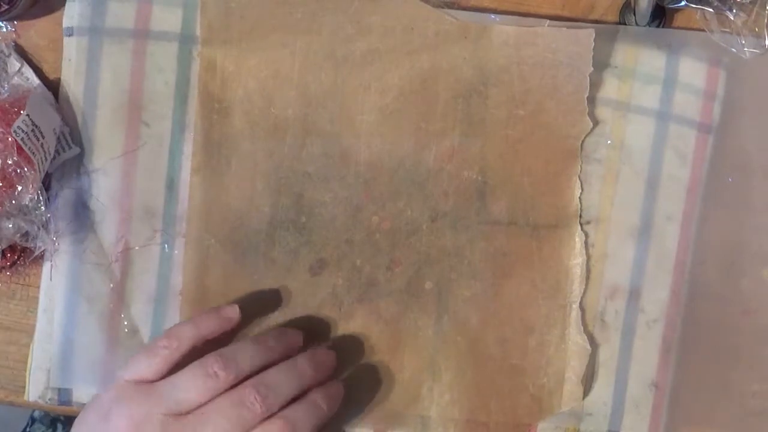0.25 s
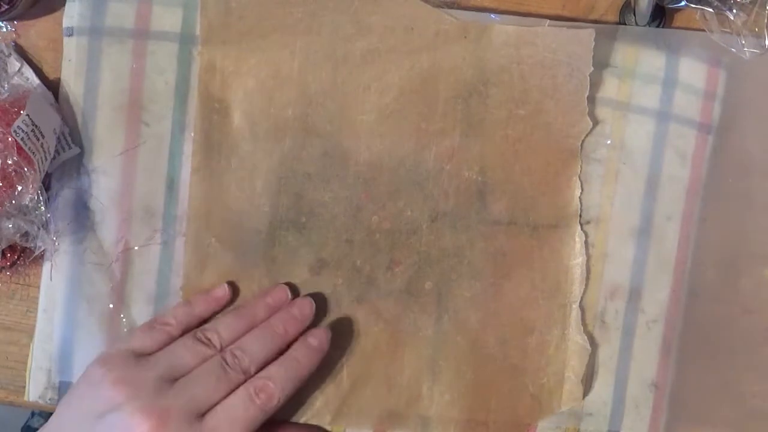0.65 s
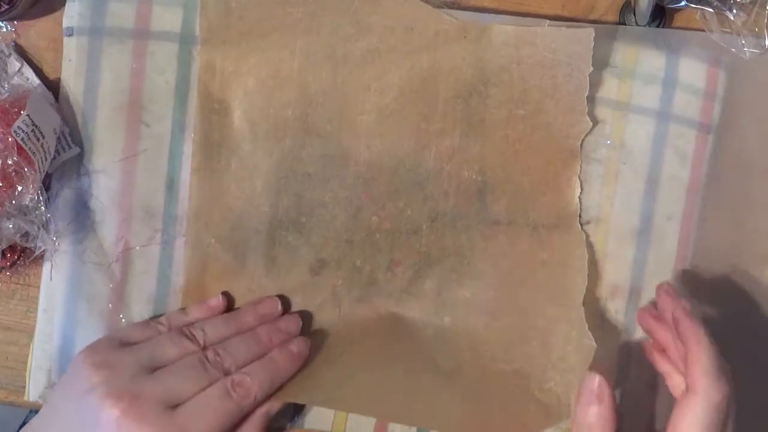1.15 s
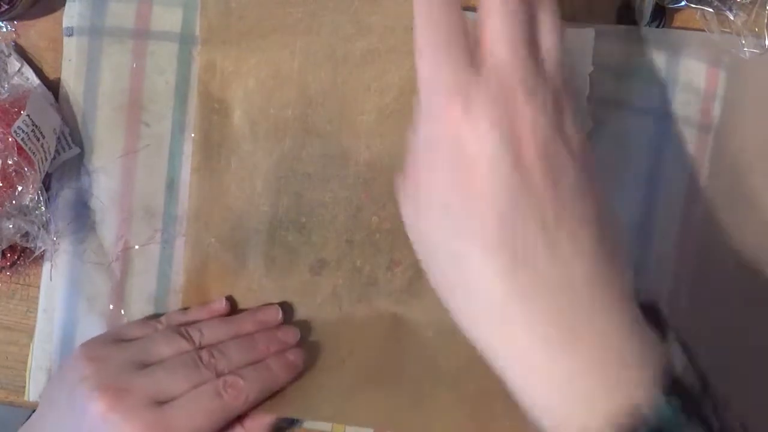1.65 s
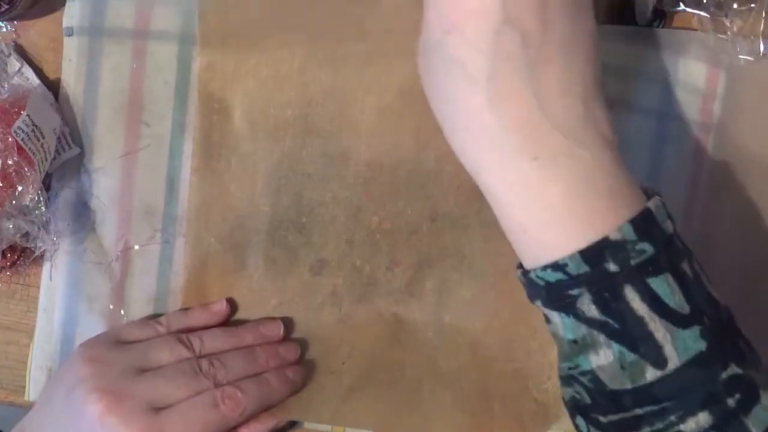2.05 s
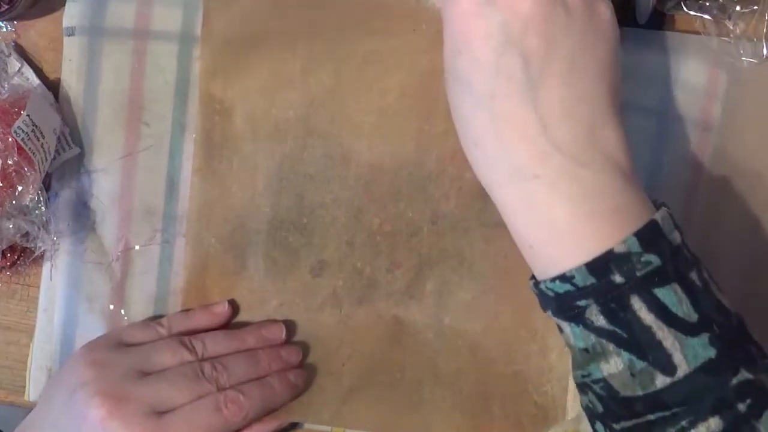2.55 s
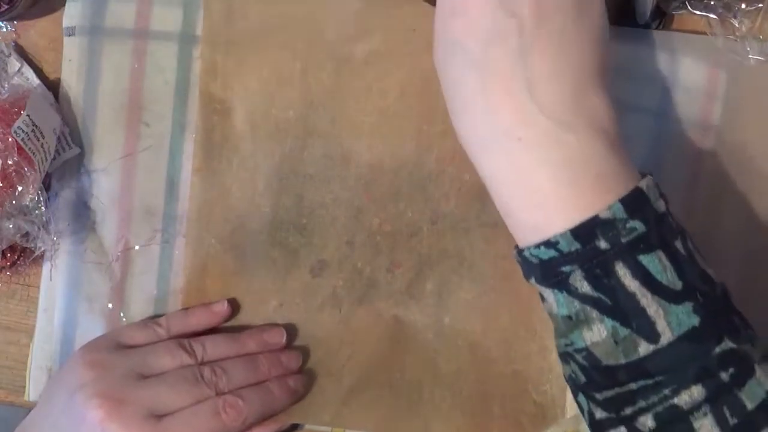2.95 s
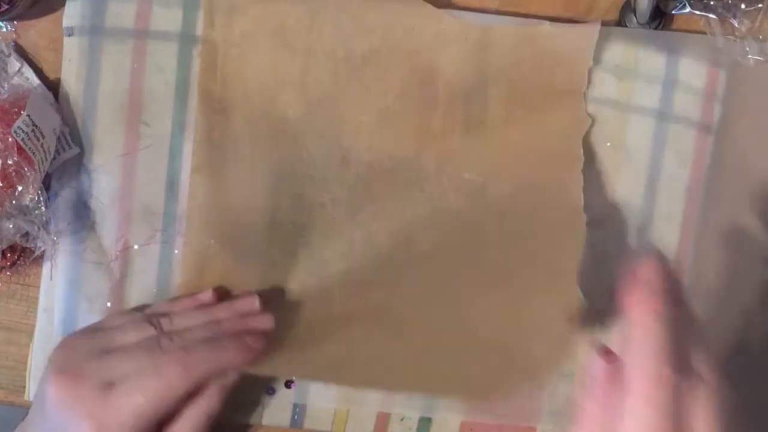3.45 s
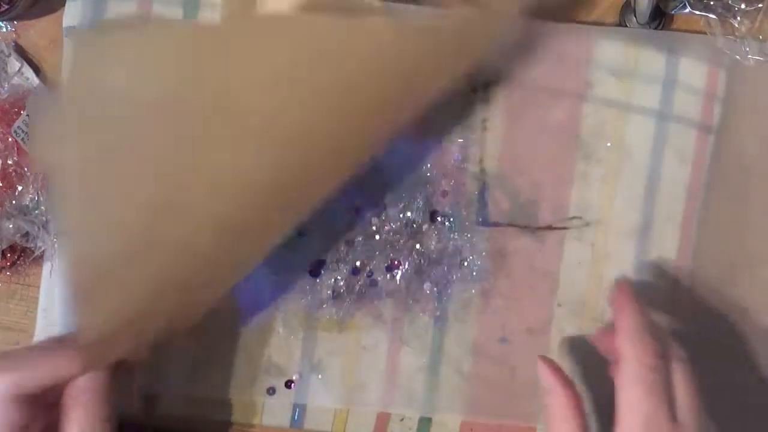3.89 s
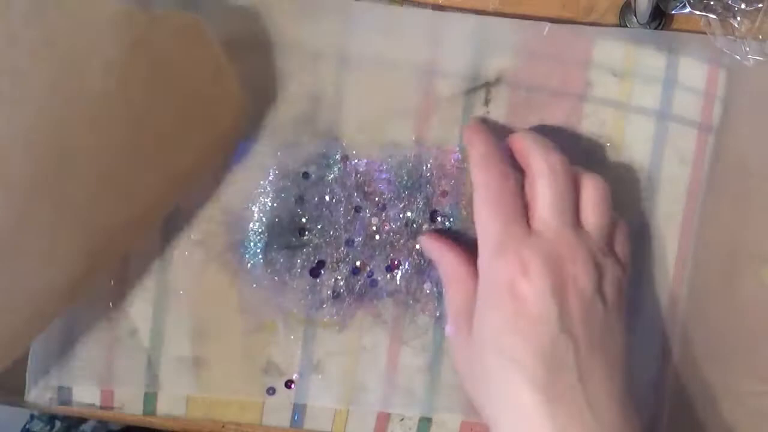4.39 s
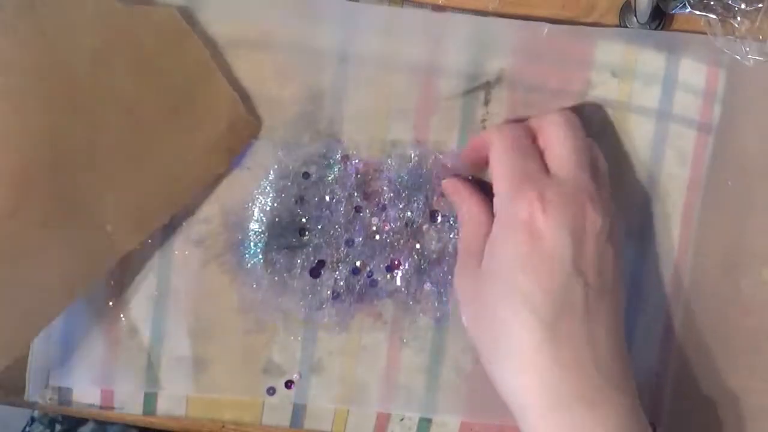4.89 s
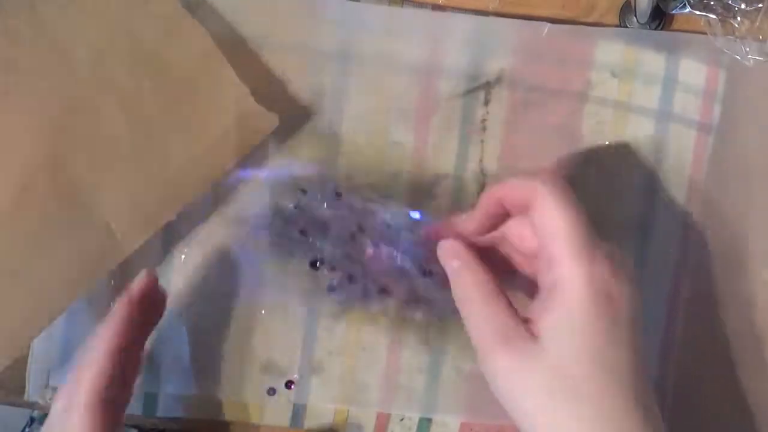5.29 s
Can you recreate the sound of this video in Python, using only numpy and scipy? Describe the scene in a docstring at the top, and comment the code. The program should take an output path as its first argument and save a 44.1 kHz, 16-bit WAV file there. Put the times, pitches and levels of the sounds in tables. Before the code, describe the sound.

Close to the microphone in a small, still room, a short rumble of an iron dragging over a table gives way to baking paper being handled. Soft rustling and separate clicks build into sharp, dry crackling as the sheet is pressed and lifted. It drops flat with a dull slap and the crinkling thins out. Underneath are soft hand rumble, very faint rapid ticking and a slight hum.

```python
"""An iron slides to a stop on a cloth-covered table, rumbling through the top, close to the microphone.
Hands press, lift and peel a sheet of baking paper: rubbing fibres rustle, buckling creases snap and
crackle, taut patches pop with a pitch, and the lifted sheet lands flat with a dull slap.
Underneath, a faint mechanism ticks and something hums in the still air of a small room."""
import sys
import numpy as np
from scipy import signal
from scipy.fft import rfft, irfft, next_fast_len
from scipy.io import wavfile
from scipy.ndimage import uniform_filter1d, map_coordinates

SR = 44100
rng = np.random.default_rng(int(sys.argv[2]) if len(sys.argv) > 2 else 0)


def generate_wav(sig):
    """Save sig (samples, or channels by samples) to the path in sys.argv[1] as 16-bit PCM at SR."""
    pcm = np.round(np.clip(np.atleast_2d(sig).T, -1, 1) * 32767).astype(np.int16)
    wavfile.write(sys.argv[1], SR, pcm)


N = 243855


def amp(db):
    """Gain of a level in dB."""
    return 10 ** (np.asarray(db) / 20)

def unit(x):
    """Scaled to rms 1."""
    return x / np.sqrt(np.mean(x ** 2) + 1e-20)

def along(points, hz):
    """(Hz, value) points joined on a log frequency axis."""
    f, v = np.transpose(points)
    return np.interp(np.log(hz + 1), np.log(f + 1), v)

def curve(points):
    """(time, value) points joined into one value per sample."""
    return np.interp(np.arange(N) / SR, *np.transpose(points))

def wobble(rate):
    """A smooth random curve, rate knots a second."""
    return map_coordinates(rng.standard_normal(int(N * rate / SR) + 4), [np.arange(N) * rate / SR])

def filtered(x, response):
    """x through a complex frequency response."""
    m = next_fast_len(N + SR // 2)
    return irfft(rfft(x, m) * response(np.fft.rfftfreq(m, 1 / SR)), m)[..., :N]

def resonances(modes):
    """Causal response of (Hz, width, dB) modes."""
    return lambda f: sum((-1) ** k * amp(db) * 1j * f * width / (hz * hz - f * f + 1j * f * width)
                         for k, (hz, width, db) in enumerate(modes))

def paper(modes):
    """Resonances with a steep low cut: thin paper radiates no bass."""
    return lambda hz: resonances(modes)(hz) * (1j * hz / (1j * hz + 500)) ** 2

def placed(seconds, shapes):
    """Short shapes summed at their start times."""
    at = np.round(seconds * SR).astype(int)[:, None] + np.arange(shapes.shape[1])
    return np.bincount(at.ravel(), shapes.ravel(), N + SR)[:N]

def bursts(count, attack, t60):
    """Rows of dying noise, each of energy 1; attack and t60 in seconds."""
    t = np.arange(SR // 40) / SR
    rows = (1 - np.exp(-t / attack)) * amp(-60 * t / t60) * rng.standard_normal((count, len(t)))
    return rows / np.linalg.norm(rows, axis=1)[:, None]

# Likeness at the microphone's left and right ports: (frequency [Hz], correlation [0..1])
PORT_LIKENESS = [(60, 0.9), (130, 0.92), (300, 0.59), (2000, 0.75), (10000, 0.88)]
def stereo(pair, response):
    """Two unrelated signals coloured and mixed as mid and side for the two ports; rms 1."""
    turn = lambda hz: np.arccos(np.clip(along(PORT_LIKENESS, hz), -1, 1)) / 2
    mid, side = filtered(pair, lambda hz: response(hz) * [np.cos(turn(hz)), np.sin(turn(hz))])
    return unit(np.array([mid + side, mid - side]))

# The iron dragging over the table, close by: (time [s], level [dB])
IRON_DRAG = [(0, -39), (.025, -50.5), (.048, -36), (.075, -44.5), (.1, -42), (.18, -48.5), (.22, -62),
             (.3, -93)]
# Modes of the table top: (frequency [Hz], width [Hz], gain [dB])
TABLE_MODES = [(62.4, 28, -7), (120, 13, 6), (140, 1.05, 0), (188, 160, -9.5), (334, 28, 0),
               (447, 105, -13.5), (663, 39, -9.5), (840, 130, -17)]
def iron():
    """The sole plate judders over the cloth; the table top rumbles and its narrowest mode rings on."""
    drag = amp(curve(IRON_DRAG))
    judder = drag * amp(1.5 * wobble(45)) * rng.standard_normal((2, N))
    mid_side = [[1], [.5]]  # close by, so nearly alike at both ports
    return np.sqrt(np.mean(drag ** 2)) * stereo(judder * mid_side, resonances(TABLE_MODES))

def crackle():
    """Tiny creases give way at random, few large and many small; rms 1."""
    when, rank = rng.random((1500, 2)).T
    size = amp(-3.2 * np.log(1 - .985 * rank))  # stops short of the rarest, largest ones
    return unit(placed(when * N / SR, size[:, None] * bursts(len(when), attack=0.00005, t60=0.002)))

def patchy(pair, spread_db):
    """Random patches of gain in time and frequency, as different parts of the sheet sound."""
    spectrum = signal.stft(pair, nperseg=256)[2]
    field = uniform_filter1d(rng.standard_normal(spectrum.shape[1:]), size=5, axis=0)
    field = uniform_filter1d(field, size=14, axis=1)
    return signal.istft(spectrum * amp(spread_db * unit(field)), nperseg=256)[1][:, :N]

# Shifts of the sheet near the microphone, the first as the iron slides over it and the rest under a hand: (full
# from [s], swell [s], hold [s], fade [s], # level [dB], sizzle over level [dB], dull flap over level [dB])
SHEET_MOVES = [(0.0, .01, 0.21, 0.03, -54, 2.5, -1.5), (0.476, 0.081, 0, 0.021, -61, 7.5, -16),
               (0.657, 0.017, 0.035, 0.03, -56.5, 4, -1.5), (0.71, 0.028, 0.24, .1, -60, 1, -5),
               (0.985, 0.12, 0.029, 0.06, -42, 0, -5.5), (1.086, 0.036, 0.0061, 0.064, -46.5, 2.5, -2),
               (1.218, 0.061, 0.15, 0.035, -48, 0.5, -6), (1.406, 0.06, 0.02, 0.29, -49.5, -1.5, -4),
               (1.89, 0.024, 0.16, 0.09, -41.5, 4, -3.5), (2.166, 0.11, 0.013, 0.097, -36.5, 4, -4),
               (2.255, 0.032, 0, 0.12, -38, 2.5, -6), (2.428, 0.21, 0.0092, 0.09, -42.5, 6.5, -4),
               (2.478, 0.013, 0.12, 0.068, -47.5, 0.5, -2.5), (2.736, 0.059, 0.28, 0.16, -42.5, 3, -4.5),
               (3.343, 0.086, 0.17, 0.072, -44.5, 1.5, -7), (3.491, 0.038, 0.013, 0.027, -30.5, -0.5, -9),
               (3.557, 0.015, 0.022, 0.042, -31.5, -1.5, -7.5),
               (3.676, 0.047, 0.099, 0.11, -42, -0.5, -3.5), (3.83, 0.039, 0.071, 0.26, -38.5, 1.5, -5),
               (4.086, 0.0051, 0.00036, 0.23, -33, -1, -2), (4.344, 0.032, 0.11, 0.046, -53.5, 1, -1),
               (4.451, 0.047, 0.048, 0.067, -35.5, 1, -3), (4.538, 0.015, 0.081, 0.15, -44, 2, 1),
               (4.643, 0.12, 0.054, 0.11, -42.5, -1, -0.5), (4.828, 0.0072, 0.011, 0.013, -36, -1, -3),
               (4.864, 0.019, 0.043, 0.078, -40, 2.5, -4.5), (5.096, 0.13, 0.046, 0.11, -55, 3.5, -9),
               (5.255, 0.23, 0.031, 0.79, -46.5, 2.5, -3), (5.473, 0.14, 0.32, .1, -48, 2.5, 0)]
def moves():
    """Gains of rustle, sizzle and flap: each move swells, holds and fades, and their powers add."""
    span_db, rest_db = 20, -70  # range of one swell or fade; the sheet settling between moves
    t = np.arange(0, N + 64, 32) / SR
    s, swell, hold, fade, db, sizzle_db, flap_db = np.transpose(SHEET_MOVES)[..., None]
    before = np.maximum(s - t, 0) / np.maximum(swell, .005)
    after = np.maximum(t - s - hold, 0) / np.maximum(fade, .005)
    move_db = db - span_db * (before + after)
    powers = [amp(2 * rest_db) + amp(2 * (move_db + over_db)).sum(axis=0)
              for over_db in (0, sizzle_db, flap_db)]
    return [np.interp(np.arange(N) / SR, t, np.sqrt(power)) for power in powers]

# The sheet's broad bending (body), the crease itself, and stiff fibres at the fold (edge),
# each: (frequency [Hz], width [Hz], gain [dB])
BODY_MODES = [(658, 410, -2.5), (1715, 1090, 2)]
CREASE_MODES = [(3120, 2250, -3), (4464, 1420, 0)]
EDGE_MODES = [(6040, 2750, 3), (10600, 3900, 3.5)]
def rustle():
    """Fibres rubbing give a fluttering hiss mixed with crackle, in the three ranges of the sheet."""
    flutter = amp(1.2 * wobble(40) + 2 * wobble(160))
    hiss = unit(flutter * rng.standard_normal((2, N)))
    rubbing = patchy(hiss + 0.55 * np.array([crackle(), crackle()]), spread_db=3.0)
    return sum(gain * stereo(rubbing, paper(modes))
               for gain, modes in zip(moves(), [CREASE_MODES, EDGE_MODES, BODY_MODES]))

# The room's air around the microphone: (frequency [Hz], relative density [dB])
AIR_SPECTRUM = [(15, 1.5), (25, -2.5), (107, -5.5), (156, -2), (798, -10), (979, -9.5), (1670, -13),
                (3000, -15.5), (4400, -19), (11000, -19), (14300, -44), (22000, -120)]
# A background hum swelling and fading: (time [s], level [dB])
HUM_LEVEL = [(.42, -99), (.55, -73), (.7, -69.5), (1.3, -71), (1.45, -101), (1.7, -67), (2.05, -75.5),
             (3.1, -71.5), (4.0, -73.5), (5.53, -81.5)]
def room_tone(hum_hz=104.7):
    """Still air and a wavering hum with a weak octave."""
    air = stereo(rng.standard_normal((2, N)), lambda hz: amp(along(AIR_SPECTRUM, hz)))
    phase = 2 * np.pi * np.cumsum(hum_hz + 0.8 * wobble(9)) / SR
    hum = np.sqrt(2) * (np.sin(phase) + 0.095 * np.sin(2 * phase))
    return amp(-61.5) * air + amp(curve(HUM_LEVEL) + 3.2 * wobble(12)) * hum

# The ring of a faint mechanism nearby: (frequency [Hz], gain [dB], t60 [s])
TICK_MODES = [(2720, 12.5, 0.015), (3010, 18, 0.011)]
def ticking(first_s=.0105, pair_s=.08003):
    """A small mechanism ticks evenly, strong and weak by turns."""
    s = np.arange(first_s, N / SR, pair_s / 2)
    t = np.arange(SR // 30) / SR
    ring = sum(amp(db - 60 * t / t60) * np.sin(2 * np.pi * hz * t) for hz, db, t60 in TICK_MODES)
    onset = 1 - np.exp(-t / 0.0013)
    level_db = -60 - 13 * (np.arange(len(s)) % 2) + rng.standard_normal(len(s))
    return placed(s, amp(level_db)[:, None] * ring * onset)

# Creases buckling at close range: (time [s], level [dB], body over level [dB], edge over level [dB])
BUCKLES = [(0.6646, -28, -5.5, -13), (0.6734, -27.5, -13, -8), (0.712, -50, -8, -1), (0.738, -43, -0.5, -7),
           (0.76, -43, -11, -19), (0.868, -43, -10, -7), (0.9102, -36, -12, 0), (0.94, -45, -21, 7),
           (0.95, -26, -15, -6), (0.968, -41, -17, 4), (0.9775, -39, -8, -4), (0.9965, -24, -11, -3),
           (1.0215, -28, -8, -3.5), (1.0401, -31, -11, -12), (1.0804, -19, -15, -6), (1.106, -32, -17, -3),
           (1.2873, -19.5, -13, -9), (1.32, -28, -10, -8), (1.3351, -27, -11, -2.5),
           (1.348, -21.5, -10.5, -12), (1.366, -25, -6.5, -12), (1.4216, -28, -11, -19),
           (1.4701, -26.5, -14, -29), (1.509, -34, -4.5, -29), (1.8367, -27, -37, -15.5),
           (1.8688, -27, -7.5, -7), (1.9059, -23.5, -7, -2.5), (1.917, -24.5, -7, 6),
           (1.924, -21.5, -22, -22), (1.9453, -23, -14, -16), (1.9518, -22, -11.5, -3),
           (1.9642, -12.5, -33, -6), (1.9668, -26, -3, 5), (1.992, -19.5, -17, 2.5), (1.9944, -27, 4, 0),
           (2.007, -14, -42, -2), (2.016, -21, -5, 2), (2.0242, -12.5, -15, -1), (2.029, -21, -32, -1),
           (2.043, -22, -37, 3.5), (2.0779, -18.5, -5.5, -4.5), (2.096, -28, -24, -10),
           (2.1193, -30, -8, 4), (2.1327, -16.5, -5, 1), (2.1442, -24, -23, 6), (2.17, -23, -23, -3),
           (2.1743, -21, -21, -5), (2.1903, -21.5, -11, 4), (2.2196, -25, -3, 0), (2.2418, -14, -28, -16),
           (2.2451, -12.5, -12, -1.5), (2.2493, -19, -25, -24), (2.2621, -24, -0.5, 1),
           (2.2776, -21.5, -7.5, 5), (2.3334, -21.5, -50, -12), (2.363, -20, -40, 5), (2.4, -27.5, -3, -1),
           (2.4413, -24, -16, -4), (2.4462, -32.5, -17, 3), (2.4821, -34, -22, 4.5), (2.62, -36.5, -1, -21),
           (2.7028, -24, -20, -0.5), (2.7265, -17, -26, 3), (2.7464, -32, 1.5, 5.5), (2.7818, -44, -24, 7),
           (2.821, -16.5, -14, -0.5), (2.8292, -38, -10, 11), (2.842, -28, -24, 0), (2.8632, -26, -3, 2),
           (2.872, -28.5, -14, 2), (2.8826, -29, -3, -7), (2.9069, -24, -3, 1.5), (2.9224, -18, -24, -7),
           (2.9723, -31, 3, 5), (2.979, -20.5, -10, 7.5), (2.985, -21, -2, 1.5), (2.9958, -31, -17, 7),
           (3.019, -19.5, -12, -3), (3.0263, -18, -24, -17), (3.048, -22.5, -32, 3),
           (3.0747, -24.5, -13.5, -10), (3.1055, -35.5, 0, -21), (3.2514, -28, -6, -33),
           (3.2571, -25, -15, -25), (3.277, -23.5, -2.5, -5.5), (3.2915, -16, -16.5, -12),
           (3.342, -38, -5, -5), (3.3657, -15, -17, -2.5), (3.3732, -16.5, -7.5, -3.5),
           (3.3942, -11.5, -30, -15.5), (3.3983, -16, -8.5, -1), (3.418, -19.5, -21, -1),
           (3.4223, -16, -32, -7), (3.43, -31, -7, 0), (3.451, -32, -27, 5), (3.466, -19, -8, 0),
           (3.475, -18.5, -4.5, -4), (3.493, -16, -23, 0), (3.5093, -19.5, -6, -2), (3.5512, -14, -17, -18),
           (3.5606, -14, -41, -11), (3.5628, -16, -25, -8), (3.5694, -15, -14, -5.5), (3.587, -32, 0, 4),
           (3.6404, -27, -8, -9.5), (3.669, -23, -17, -8), (3.6906, -28, -21, -4.5),
           (3.7251, -17, -12, -53), (3.7786, -21, -19, 0), (3.7915, -29.5, -4, -21),
           (3.7999, -20.5, -14, -27), (3.819, -20.5, -8.5, -12), (3.8843, -19.5, -37, -6),
           (3.8924, -21.5, -8, -13), (3.9287, -21, -20, -10), (3.9515, -14, -13, -6),
           (4.033, -21.5, -11.5, -10.5), (4.08, -37, 11, -11), (4.0889, -20, 0, -10),
           (4.0952, -17.5, -4.5, -8), (4.107, -24.5, 2, -10), (4.2013, -26.5, -17, -7),
           (4.2413, -34, 3.5, -23), (4.269, -25, -7.5, -16), (4.291, -24, -17, -13),
           (4.333, -28, -1.5, -18), (4.3409, -19, -20, -13.5), (4.427, -34.5, -23, 12),
           (4.544, -28.5, -3.5, -20), (4.5958, -18.5, -35, -13), (4.6442, -18, -7.5, -8),
           (4.7001, -29.5, 0.5, 2.5), (4.7682, -28, -11, -33), (4.8152, -25.5, -10, -6.5),
           (4.871, -34, -24, -8), (4.997, -36, -11, 2.5), (5.2624, -33, -5, 8), (5.3477, -28, -11, -6.5),
           (5.419, -28.5, -28, -4), (5.4642, -31, -13, -9), (5.48, -24.5, -33, 5.5), (5.5037, -26, -9, -5),
           (5.5112, -29.5, -5, 2.5)]
# The bursts of body, crease and edge: (energy gain [dB], attack [s], t60 [s])
BUCKLE_BURSTS = [(22.48, 0.0007, 0.022), (19.2, 0.00015, 0.012), (17.86, 0.0011, 0.0046)]
def snaps(click_share=0.38):
    """Each buckling crease is a click inside a short burst; big folds add body, sharp ones add edge."""
    s, db, body_db, edge_db = np.transpose(BUCKLES)
    ranges = [(body_db, BODY_MODES), (0, CREASE_MODES), (edge_db, EDGE_MODES)]
    out = np.zeros(N)
    for (over_db, modes), (energy_db, attack, t60) in zip(ranges, BUCKLE_BURSTS):
        click = click_share * np.eye(1, SR // 40, round(attack * SR))
        shapes = amp(db + over_db + energy_db)[:, None] * (bursts(len(s), attack, t60) + click)
        out += filtered(placed(s, shapes), paper(modes))
    return out

# Taut patches of the sheet flipping over, close by, and near 1 s a brief ring of rubbing friction: (time [s],
# pitch [Hz], level [dB])
PITCHED_RINGS = [(0.9965, 3550, -19), (1.002, 3320, -18), (1.0804, 4470, -19), (1.287, 3710, -19),
                 (2.133, 1540, -20), (2.334, 4540, -11.5), (2.7262, 1600, -23), (2.782, 7200, -16),
                 (2.978, 7060, -17), (2.9852, 1380, -23), (3.048, 4750, -9.5), (3.278, 3130, -22),
                 (3.2905, 2840, -28), (3.3645, 3200, -15), (3.3732, 1000, -27), (3.3992, 3320, -15),
                 (3.465, 4480, -13), (3.495, 4190, -9), (3.569, 3350, -13), (4.291, 1000, -32.5)]
def pops(t60_cycles=16):
    """A flipping patch, or the rubbing near 1 s, rings briefly at its own pitch."""
    s, hz, db = np.transpose(PITCHED_RINGS)[..., None]
    cycles = hz * np.arange(SR // 30) / SR
    envelope = amp(db - 60 * cycles / t60_cycles) * (1 - np.exp(-cycles / 0.36))
    return placed(s[:, 0], envelope * np.sin(2 * np.pi * cycles))

# Hands and sleeves weighing on the table: (time [s], level [dB])
HAND_PRESSURE = [(1.8, -99), (1.92, -62), (2.6, -61.5), (3.06, -55), (3.23, -60.5), (3.58, -49),
                 (3.66, -58.5), (4.2, -54.5), (4.6, -52.5), (5.1, -65), (5.53, -60)]
def hands():
    """Soft shifting contact gives a lumpy low rumble."""
    lumps = amp(2.5 * wobble(25)) * rng.standard_normal((2, N))
    rumble = stereo(lumps, resonances([(59.0, 67, -6.0), (158, 82, 2.0), (346, 1060, -1.0)]))
    return amp(curve(HAND_PRESSURE)) * rumble

# The lifted sheet landing flat on the cloth: (time [s], level [dB])
LANDINGS = [(4.0891, 12), (4.1457, 0)]
def slaps():
    """A flat landing pushes air out at once, then in a dull, dry puff."""
    s, db = np.transpose(LANDINGS)
    push = np.eye(1, SR // 40)
    puff = 0.11 * bursts(len(s), attack=0.00083, t60=0.016)
    landings = placed(s, amp(db)[:, None] * (push + puff))
    return filtered(landings, resonances([(640, 420, 1.5), (1650, 660, -11)]))

# Decay of the small room around the table: (frequency [Hz], t60 [s])
ROOM_DECAY = [(200, 0.2), (2000, 0.06), (10000, 0.03)]
def walls(x):
    """Each frequency of the echo dies at its own speed; the echo keeps changing, as the sheet moves."""
    block, delay = SR // 4, 90  # samples; each block gets a fresh random tail
    out = np.zeros((2, N + SR))
    for start in range(0, N, block):
        hz, t, noise = signal.stft(rng.standard_normal((2, SR // 3)), SR, nperseg=256)
        decay = amp(-60 * t / along(ROOM_DECAY, hz)[:, None])
        mid, side = signal.istft(noise * decay, SR, nperseg=256)[1]
        tail = mid + 0.47 * np.array([side, -side])
        wet = signal.fftconvolve(x[None, start:start + block], tail / np.linalg.norm(tail[0]), axes=1)
        out[:, start + delay:start + delay + wet.shape[1]] += wet
    return out[:, :N]

# Where the sheet sounds from, in front of the microphone: (time [s], left over right [dB])
SHEET_BALANCE = [(0, 4), (.7, 0), (2.7, 0), (4.0, -0.5), (4.35, -3), (4.45, -1), (5.53, -.6)]
def scene():
    """Close paper, ticks and their echo drift a little sideways, over table rumble and the quiet room."""
    clicks = snaps() + pops() + slaps() + ticking()
    near = clicks + amp(-9.5) * walls(clicks) + rustle()
    balance_db = curve(SHEET_BALANCE)
    return near * amp([balance_db / 2, -balance_db / 2]) + iron() + hands() + room_tone()

# Treble roll-off of the whole sound: (frequency [Hz], gain [dB])
TREBLE_ROLLOFF = [(20, 0), (10800, 0), (11050, -8), (11250, -31), (12100, -48), (15600, -60)]
def record(dry):
    """The sound dulls steeply above 11 kHz, with only faint sparkle up to 15.6 kHz."""
    top_hz = 15590
    return filtered(dry, lambda hz: amp(along(TREBLE_ROLLOFF, hz)) * (hz < top_hz))


dry = scene()
out = record(dry)
generate_wav(out)
```